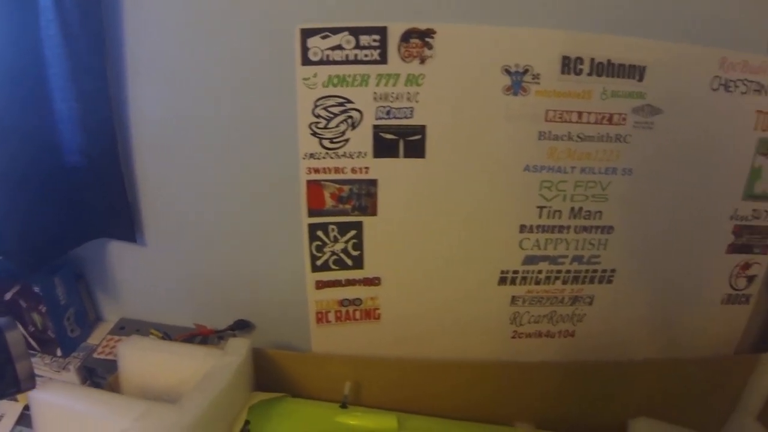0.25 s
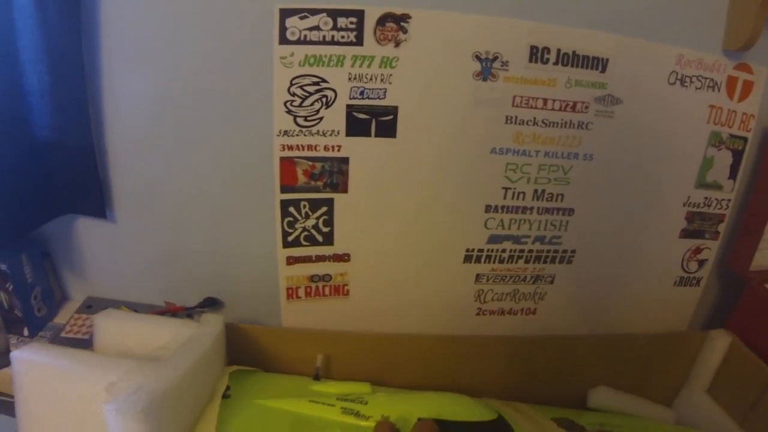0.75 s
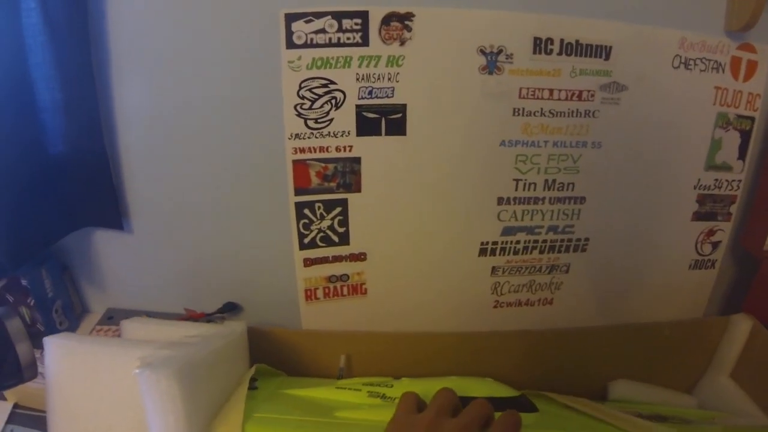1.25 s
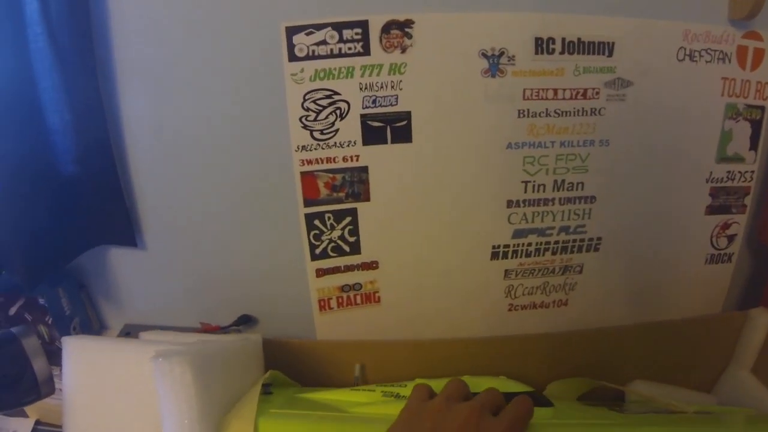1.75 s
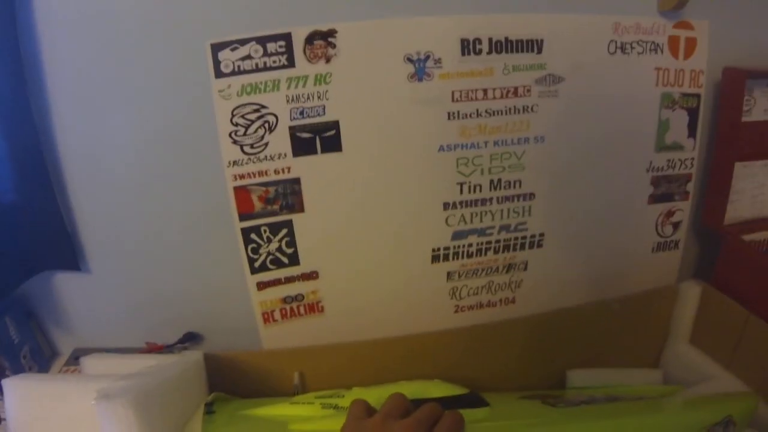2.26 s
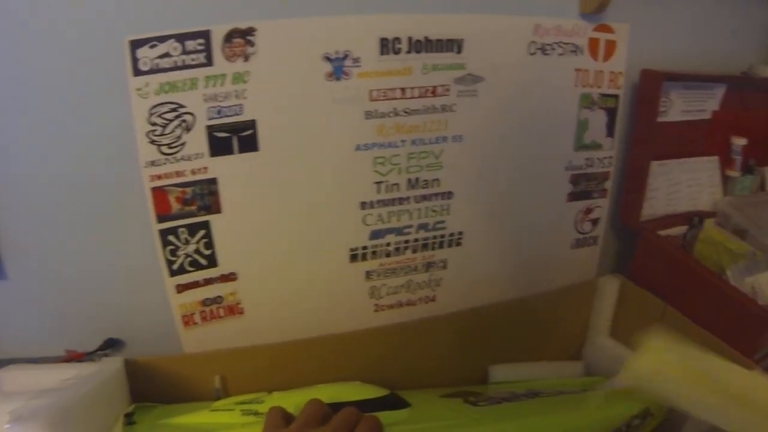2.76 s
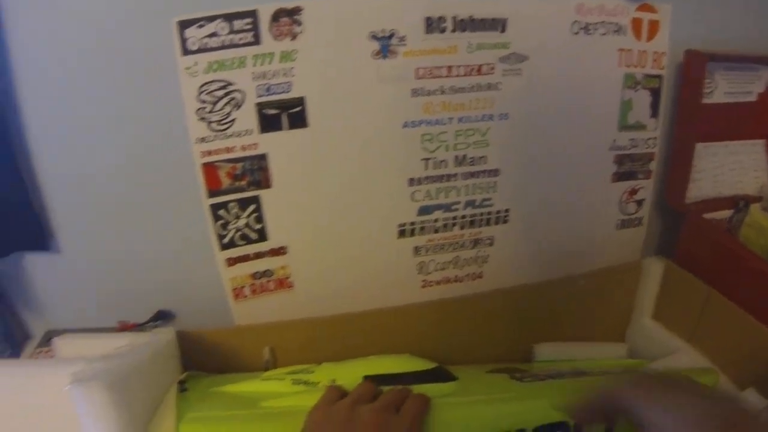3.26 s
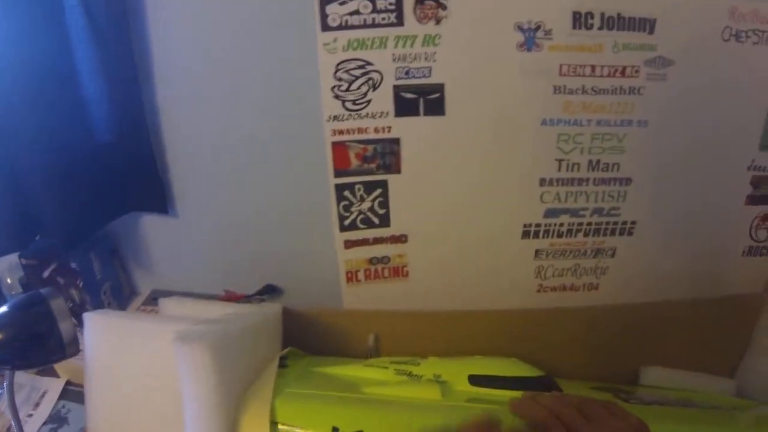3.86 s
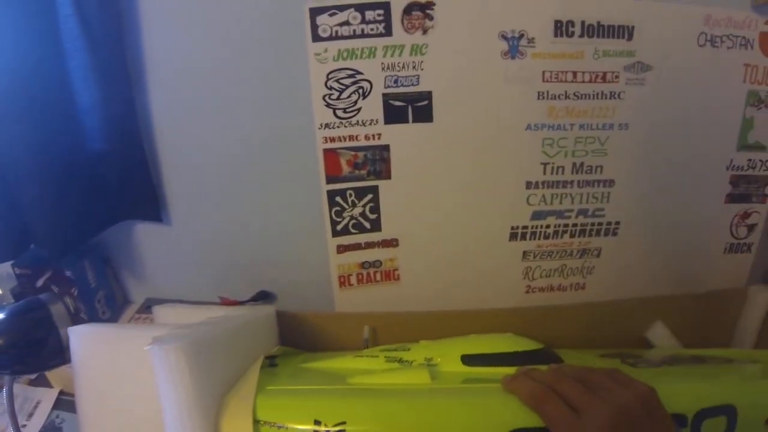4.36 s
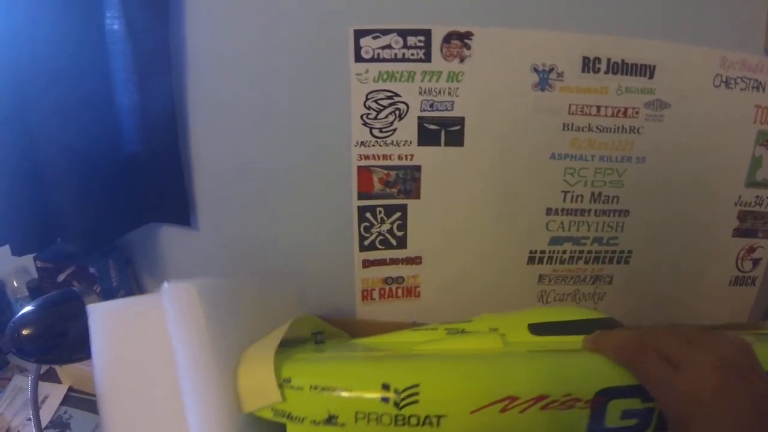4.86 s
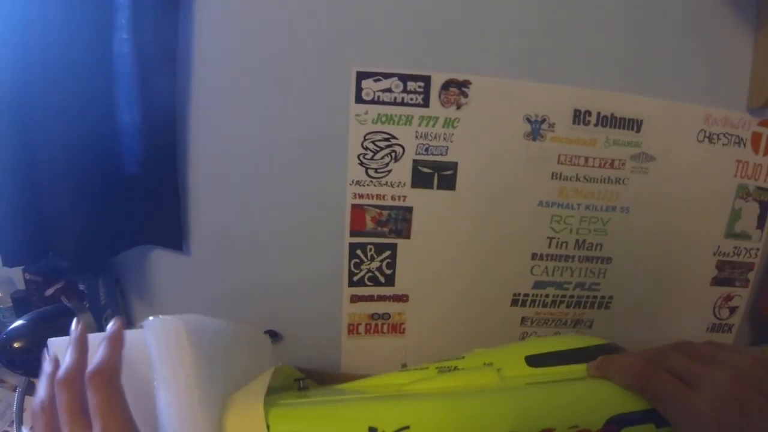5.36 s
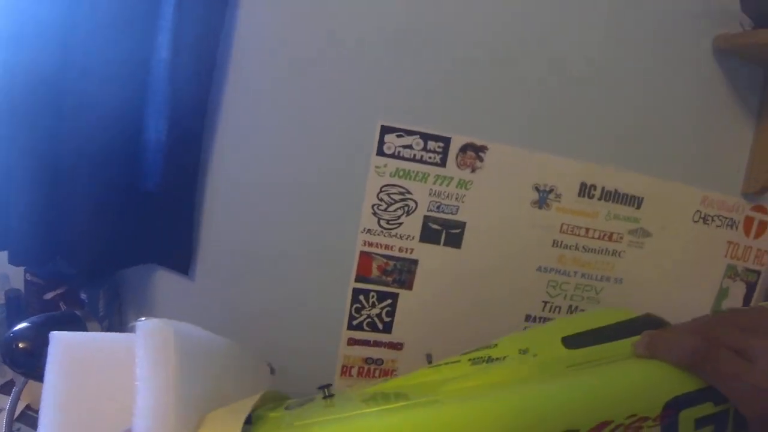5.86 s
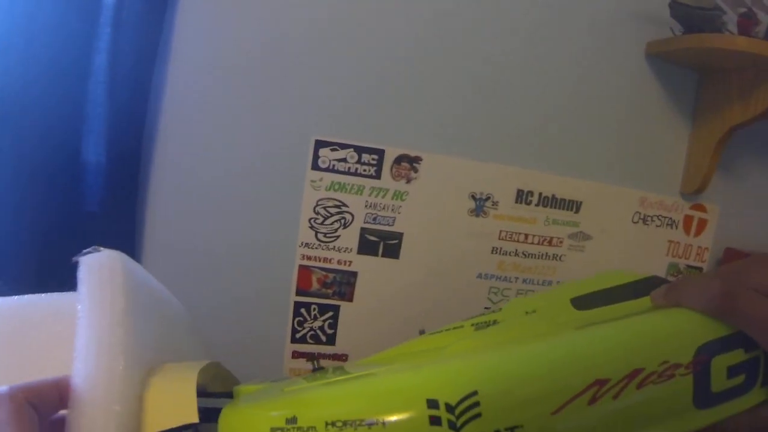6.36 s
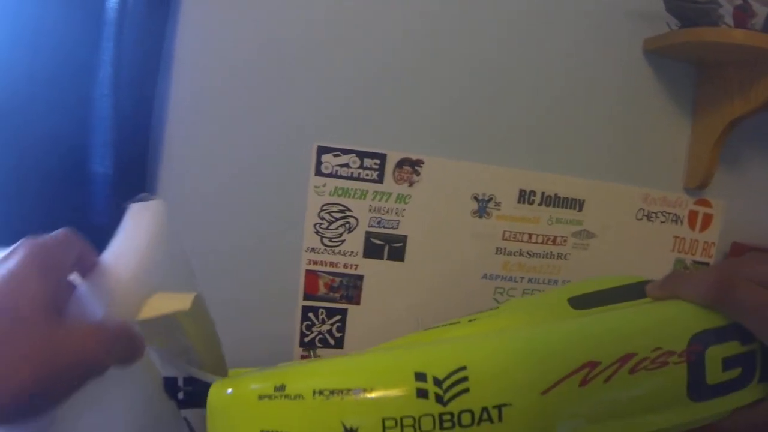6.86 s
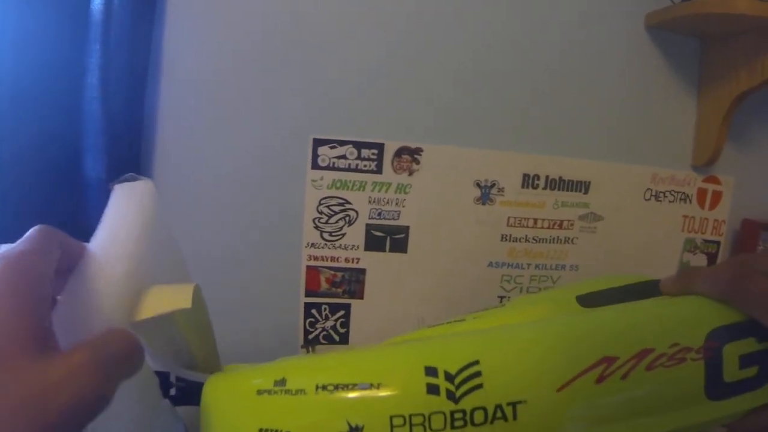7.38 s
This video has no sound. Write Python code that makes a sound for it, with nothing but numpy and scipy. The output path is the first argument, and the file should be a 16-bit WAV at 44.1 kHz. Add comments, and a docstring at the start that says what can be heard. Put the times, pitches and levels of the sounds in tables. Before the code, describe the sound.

A hollow model boat hull is worked out of foam packing and a cardboard box, close to the microphone in a small room with a faint steady hush. For the first second, foam rubs and crackles with dry snaps and light bumps, then eases off. From 2 to 2.6 seconds comes a loud cluster of hollow knocks, low thumps, snaps and rasping foam. After a lull, the hull creaks briefly against the foam and bumps at about 3.5 seconds, followed by soft scrapes. A second group of hollow knocks with rubbing falls between 4.7 and 5.3 seconds. Small snaps and light scrapes continue, fading until about 6.9 seconds, when a short creak, a low thud from the flexing box and more rubbing break in. A sharp knock with a low thump lands at about 7.5 seconds.

```python
"""Foam rubs and rasps among hollow knocks and dry snaps: a hollow model boat hull is worked out of
its foam packing and cardboard box in a small room, close to a camera. Friction is modelled as stick-slip grains,
bead rings and noise; blows as a contact and chatter exciting damped modes and panels; snaps as decaying bursts.
Short tones arise where slips lock to a panel's pitch. Air pushed by the walls, echo and a hush surround them."""
import sys
import numpy as np
from scipy import signal
from scipy.fft import rfft, irfft, next_fast_len
from scipy.io import wavfile
from scipy.ndimage import uniform_filter1d, map_coordinates

SR = 44100
rng = np.random.default_rng(int(sys.argv[2]) if len(sys.argv) > 2 else 0)


def digitize_waveform(pressure):
    """Quantize a signal to 16-bit integers and store it at the path in sys.argv[1].

    Rows of a 2-D input are taken as channels; values are limited to [-1, 1].
    """
    field = np.atleast_2d(pressure).T
    bounded = np.clip(field, -1, 1)
    quanta = np.round(bounded * 32767).astype(np.int16)
    wavfile.write(sys.argv[1], SR, quanta)


N = 336042

# Steady hush of the room: (frequency [Hz], spectral density [dB per Hz])
QUIET_SPECTRUM = [(20, -5), (44, -7.5), (60, 6), (85, -23.5), (200, -22.5), (450, -19), (800, -13.5),
                  (1300, -23), (2000, -24), (4000, -26.5), (6500, -44), (10000, -40), (15000, -48)]
# Reverberation of the room: (frequency [Hz], decay time t60 [s])
ROOM_DECAY = [(100, 0.42), (300, 0.28), (800, 0.26), (2000, 0.19), (5000, 0.26), (14000, 0.25)]
# Air moved by the box walls, before trim and surge: (time [s], level [dB])
SWAY_LEVELS = [(0.0, -38), (0.27, -35), (0.45, -38), (1.89, -48), (2.12, -20.5), (2.33, -42), (2.46, -27.5),
               (2.8, -44.5), (3.4, -43.5), (3.5, -30.5), (4.75, -44.5), (4.86, -31), (4.99, -33.5),
               (5.47, -43.5), (6.81, -45.5), (6.92, -21.5), (7.15, -45), (7.47, -49), (7.53, -18),
               (7.62, -33)]
# Spectrum of that air: (frequency [Hz], spectral density [dB per Hz])
AIR_SPECTRUM = [(12, -5), (22, -4.5), (34, 1.5), (48, -13), (62, -1), (90, -24.5), (160, -40), (400, -84)]
# Modes of the hull in its box, before scatter: (frequency [Hz], relative level [dB], decay time t60 [s])
HULL_MODES = [(129.2, -10, 0.41), (186, -32, 0.21), (216, -22, 0.2), (328.1, -2.5, 0.21), (400, 3, 0.041),
              (475.3, 3.5, 0.093), (592, -10, 0.41), (716, -8.5, 0.053), (835, -14, 0.51), (979, 3, 0.044),
              (1450, -24.5, 0.35), (1650, -12, 0.06), (1774, -2, 0.05), (1913, 5, 0.021), (2150, 9, 0.022),
              (2200, -4, 0.067), (3050, 9, 0.049), (3290, -13, 0.12)]
# Hull juddering over foam: (time [s], length [s], mean slip rate [1/s], level [dB], rasp against tone [dB])
GROANS = [(3.488, 0.024, 480, -27.5, -10), (3.527, 0.03, 452, -20, -4.5), (3.586, 0.04, 450, -32.5, -6),
          (6.886, 0.045, 332, -21.5, -23)]
# Response of the rubbed shell: (frequency [Hz], gain [dB])
RASP_RESPONSE = [(700, -22), (860, 8), (1030, 7), (1150, -12), (1450, -19), (1600, -2), (1740, -4),
                 (1900, -20), (2200, -20), (2400, -4), (2700, -25), (3100, -12), (3300, -6), (3700, -29),
                 (9000, -42)]
# Snaps of foam and card, before trim: (time [s], peak level [dB], centre frequency [Hz])
SNAPS = [(0.136, -27.5, 2980), (0.166, -20.5, 2060), (0.46, -19, 2600), (0.482, -27, 1960),
         (0.491, -18.5, 2120), (0.553, -22.5, 1650), (0.611, -19, 1580), (0.641, -23, 1920),
         (1.203, -38, 1470), (1.351, -27.5, 3060), (1.423, -33.5, 1500), (1.807, -27.5, 1620),
         (1.932, -19.5, 1960), (2.378, -16.5, 2200), (2.496, -17, 1774), (2.614, -23.5, 2420),
         (2.788, -33.5, 2370), (2.851, -28, 1440), (2.92, -30.5, 2000), (3.953, -29.5, 1840),
         (5.523, -28.5, 1600), (5.581, -22.5, 1620), (6.185, -31, 3100), (6.617, -38, 1860),
         (7.014, -20.5, 1840), (7.064, -27.5, 2140)]
# Short strokes of foam over card, before trim: (time [s], length [s], level [dB], centre frequency [Hz])
SCRAPES = [(0.182, 0.084, -36.5, 1930), (0.391, 0.064, -35, 890), (0.746, 0.078, -37.5, 1770),
           (1.07, 0.11, -45, 1020), (1.692, 0.25, -40, 1080), (2.002, 0.062, -26, 2230),
           (2.212, 0.12, -36.5, 1790), (2.97, 0.075, -46.5, 1930), (3.343, 0.14, -44.5, 2310),
           (4.018, 0.14, -40, 1860), (4.356, 0.076, -48.5, 3000), (4.672, 0.19, -37.5, 820),
           (5.183, 0.12, -38.5, 1260), (5.537, 0.046, -37, 1650), (5.761, 0.063, -38, 1750),
           (5.907, 0.033, -48, 1170), (6.172, 0.045, -38, 1560), (6.72, 0.29, -46, 1810),
           (6.888, 0.073, -40, 6000), (6.999, 0.069, -46, 2260), (7.062, 0.011, -32.5, 1160),
           (7.21, 0.061, -38, 1170), (7.41, 0.079, -45, 3100)]
# Sliding contact, before trims: (time [s], heavy drag level [dB], rub level [dB], surface grit level [dB])
SLIDE_LEVELS = [(0.0, -42, -40, -53), (0.34, -40.5, -37.5, -51), (0.78, -38.5, -41.5, -49.5),
                (0.98, -45.5, -41, -59), (1.51, -52.5, -52.5, -54), (1.78, -48, -47, -61),
                (2.08, -54, -36, -37), (2.19, -42, -30, -46), (2.33, -41.5, -39.5, -42.5),
                (2.46, -29, -28.5, -32.5), (2.61, -62, -55.5, -50), (2.97, -52, -51.5, -86),
                (3.33, -52, -51, -64), (3.54, -42, -46.5, -61.5), (4.35, -46.5, -50, -60),
                (4.61, -45, -43, -52.5), (4.86, -49, -32.5, -41.5), (5.01, -46.5, -56, -66),
                (5.32, -51.5, -51, -66), (5.71, -42.5, -43.5, -57), (5.86, -51, -51, -60),
                (6.73, -53, -57.5, -62.5), (6.94, -36.5, -35, -44), (7.19, -53.5, -61, -60),
                (7.45, -49, -48.5, -60), (7.62, -40, -45.5, -47)]
# Colour of the heavy drag: (frequency [Hz], spectral density [dB per Hz])
DRAG_SPECTRUM = [(60, -11), (100, -0.5), (130, -0.5), (160, 1.5), (200, -4), (260, -4.5), (335, -2.5),
                 (470, -5), (590, -3.5), (720, -5), (950, -8), (1800, -48.5)]
# Colour of the rub: (frequency [Hz], spectral density [dB per Hz])
RUB_SPECTRUM = [(350, -28), (650, 3.5), (950, 3.5), (1300, -3.5), (1900, 1.5), (2600, -10), (3200, -2),
                (4200, -14), (5500, -23), (9000, -43)]
# Colour of the surface grit: (frequency [Hz], spectral density [dB per Hz])
GRIT_SPECTRUM = [(1800, -25), (3000, 3), (4300, 11), (5300, 13.5), (6500, 3), (8500, 13), (10500, 1),
                 (12500, -4), (15500, -18)]
# Blows on hull and box: (time [s], strength [dB], contact rise [s], chatter decay time t60 [s],
# pitch of the struck panel [Hz], hardness [dB], weight [dB])
KNOCKS = [(0.103, -30.5, 0.0012, 0.029, 615, 3, 8.5), (0.16, -41.5, 0.0087, .16, 193, 1, 9),
          (0.275, -40.5, 0.0038, 0.1, 187, -6, 11.5), (0.345, -32, 0.0083, .14, 312, -19, -5),
          (0.8716, -36, 0.0003, 0.037, 590, 13, 5.5), (1.5117, -42.5, 0.00035, 0.029, 454, 7.5, -8),
          (2.02, -23.5, 0.0012, 0.049, 640, 6, 7), (2.038, -20.5, 0.00043, 0.033, 837, 3, 4.5),
          (2.059, -27.5, 0.0054, 0.3, 460, 5, 7.5), (2.101, -17, 0.00031, 0.12, 447, 2.5, -1),
          (2.416, -24.5, 0.00042, 0.067, 556, 2.5, 0.5), (2.456, -36, 0.0054, 0.21, 484, 5, 12.5),
          (2.5175, -21.5, 0.0014, 0.14, 505, -0.5, -14), (3.347, -43.5, 0.0025, .094, 202, 2, 11.5),
          (3.4896, -34.5, 0.0013, .08, 476, -6, 8), (3.535, -24, 0.0049, 0.048, 486, -8.5, 2),
          (3.8293, -41, 0.0025, .045, 201, -5.5, -8), (4.073, -33, 0.0068, 0.11, 470, -5.5, 5.5),
          (4.458, -34, 0.0051, 0.051, 2320, 10.5, 2.5), (4.785, -23, 0.00073, 0.13, 457, -2, -8),
          (4.815, -22.5, .006, 0.078, 354, 0, 8.5), (4.843, -12, 0.0056, 0.021, 477, -13.5, -6),
          (4.877, -30.5, 0.0038, 0.13, 479, -1, 8.5), (5.0411, -23, 0.0015, 0.22, 483, -3, -3.5),
          (5.2194, -24.5, 0.00153, 0.039, 326, -14, -2.5), (5.4105, -40.5, 0.00039, 0.069, 760, 1.5, -1),
          (6.1011, -39, 0.00024, 0.032, 325, 9, -15), (6.892, -24, .012, 0.045, 476, 1.5, 2.5),
          (6.985, -46.5, 0.004, .08, 335, -21, 15.5), (7.5113, -16, 0.00019, 0.05, 1300, -4.5, -2.5),
          (7.585, -44, 0.0059, 0.12, 189, 2, 8)]
# Response of the struck contact: (frequency [Hz], gain [dB])
CONTACT_RESPONSE = [(150, 17.5), (260, -6.5), (335, 0), (470, -3), (590, -3.5), (960, 3), (1200, -1.5),
                    (1900, -1.5), (2650, -10), (3250, -4), (4300, -14.5), (6500, -25), (8500, -21),
                    (15000, -39)]
# Response of the air space in the box: (frequency [Hz], gain [dB])
BOX_RESPONSE = [(60, -11), (95, -9.5), (130, -1), (155, -8.5), (195, -8), (260, -13.5), (400, -23.5)]
# Registers of a blow, in order push, boom, body, clack, crack, fizz: (low edge [Hz], high edge [Hz])
REGISTERS = [(20, 90), (100, 250), (290, 680), (720, 2300), (2500, 5500), (6200, 15000)]
# Share of a blow in each register: (level [dB], gain per hardness [dB/dB], gain per weight [dB/dB])
REGISTER_SHARES = [(-9.5, 0, 1.36), (-6, 0, 1.22), (1.5, 0, 0), (-1, 0.94, 0), (-11, 1.41, 0),
                   (-29.5, 1.39, 0.5)]

TOP_HZ = 15600  # upper band limit
DRAG_DB, RUB_DB, GRIT_DB = 0.65, -2.84, -12  # trims on the sliding levels
SWAY_DB, SWAY_SURGE_DB = -2.5, 1.5  # trim on the sway levels, and depth of its uneven surges
# stray ticks: mean rate, level against the rub column, centre frequency
CRACKLES_PER_S, CRACKLE_DB, CRACKLE_HZ = 110, -9, 1850


def amp(db):
    """Level law: decibels to amplitude gain."""
    return 10 ** (np.asarray(db) / 20)


def unit(x):
    """Normalisation: scale to rms 1."""
    return x / np.sqrt(np.mean(x ** 2) + 1e-20)


def along(points, hz):
    """Logarithmic frequency scale: read (Hz, value) points by interpolation."""
    f, v = np.transpose(points)
    return np.interp(np.log(hz + 1), np.log(f + 1), v)


def curves(rows):
    """Linear interpolation: one value per sample for each column after the time."""
    s, *cols = np.transpose(rows)
    return [np.interp(np.arange(N) / SR, s, c) for c in cols]


def wobble(rate):
    """Slow random process: a smooth curve through random knots, rate of them a second."""
    knots = rng.standard_normal(int(N * rate / SR) + 4)
    return map_coordinates(knots, [np.arange(N) * rate / SR])


def colour(x, points):
    """Minimum-phase filtering: a folded cepstrum makes the gain of the (Hz, dB) points causal."""
    m = 2 * next_fast_len(len(x) // 2 + 4096)
    gain = amp(along(points, np.fft.rfftfreq(m, 1 / SR)))
    cepstrum = irfft(np.log(gain), m)
    cepstrum[1:m // 2] *= 2
    cepstrum[m // 2 + 1:] = 0
    return irfft(rfft(x, m) * np.exp(rfft(cepstrum)), m)[:len(x)]


def band(x, lo_hz, hi_hz, order=2):
    """Band limitation: causal Butterworth band-pass."""
    edges = [lo_hz, min(hi_hz, SR / 2 - 100)]
    return signal.sosfilt(signal.butter(order, edges, "band", fs=SR, output="sos"), x)


def fade(t, t60):
    """Linear damping: exponential decay, 60 dB down after t60."""
    return np.exp(-np.log(1000) * t / t60)


def add(track, s, sound):
    """Superposition: mix a sound into the track at time s."""
    part = track[max(round(s * SR), 0):][:len(sound)]
    part += sound[:len(part)]


def hush():
    """Stationary noise: the steady quiet of the room."""
    return amp(-53.5) * unit(colour(rng.standard_normal(N), QUIET_SPECTRUM))


def room(x, delay=.006, count=20):
    """Reverberation: decaying noise tails answer the sound, drawn afresh along the way and cross-faded."""
    out, edges = np.zeros(N), np.linspace(0, N, count + 1).astype(int)
    for start, end in zip(edges, edges[1:]):
        # each frequency of the tail decays at its own rate
        hz, t, z = signal.stft(rng.standard_normal(SR // 2), SR, nperseg=256)
        decay = fade(t, along(ROOM_DECAY, hz)[:, None])
        tail = signal.istft(z * decay, SR, nperseg=256)[1]
        # neighbouring stretches cross-fade into each other
        width = end - start
        first, last = max(start - width // 2, 0), min(end + width // 2, N)
        offset = np.arange(first, last) - (start + end) / 2
        share = np.cos(np.pi / 2 * offset / width)
        echo = signal.fftconvolve(x[first:last] * share, tail / np.linalg.norm(tail))
        add(out, first / SR + delay, echo)
    return out


def sway():
    """Volume displacement: the flexing box pushes slow, uneven waves of air at the microphone."""
    level_db, = curves(SWAY_LEVELS)
    gain = amp(level_db + SWAY_DB + SWAY_SURGE_DB * wobble(7.8))
    return gain * unit(colour(rng.standard_normal(N), AIR_SPECTRUM))


def hull_ring(x, ring_db, scatter_db):
    """Modal resonance: the contact plus hull modes that vary with where it is touched and held."""
    modes = np.zeros(len(x))
    scatter = rng.standard_normal((len(HULL_MODES), 2))
    for (hz, db, t60), (louder, sharper) in zip(HULL_MODES, scatter):
        radius = fade(1 / SR, t60)
        turn = np.cos(2 * np.pi * hz * (1 + 0.0051 * sharper) / SR)
        ring = signal.lfilter([1, -radius * turn], [1, -2 * radius * turn, radius ** 2], x)
        modes += amp(db + scatter_db * louder) * ring
    return x + amp(ring_db) * modes


def foam_colour(x, hz):
    """Broad resonance: a hump whose centre depends on the size of the contact."""
    hump = [(hz / 8, -16), (hz / 2, -4), (hz, 0), (hz * 1.43, -5), (hz * 2.87, -19), (hz * 7, -34)]
    return colour(x, hump)


def slips(rate, size_db, clump_db, smooth):
    """Stick-slip: irregular tiny releases of uneven size, in clumps, over a smooth share of friction."""
    happens = rng.random(N) < rate / SR
    sizes = amp(size_db * np.minimum(rng.exponential(size=N), 4)) * rng.choice([-1, 1], N)
    friction = unit(happens * sizes) + smooth * rng.standard_normal(N)
    return friction * amp(clump_db * wobble(55))


def groans(jitter=0.071, octave_db=-15, uneven_db=-2.5):
    """Locked stick-slip: slips briefly follow a panel's pitch, and each one also rasps the shell."""
    out = np.zeros(N)
    waver, pressure = wobble(250), amp(uneven_db * wobble(210))
    for s, length, hz, db, rasp_db in GROANS:
        start, n = int(s * SR), int(length * SR)
        phase = 2 * np.pi * np.cumsum(hz * (1 + jitter * waver[start:start + n])) / SR
        tone = unit(np.sin(phase) + amp(octave_db) * np.sin(2 * phase))
        pulsed = rng.standard_normal(n) * (1 + np.cos(phase)) ** 2
        rasp = unit(colour(pulsed, RASP_RESPONSE))
        groan = (tone + amp(rasp_db) * rasp) * pressure[start:start + n] * np.hanning(n)
        add(out, s, amp(db) * unit(groan))
    return out


def crackle(size_db=2.0, t60=0.023):
    """Random releases: sliding edges catch and let go in stray ticks, louder the harder the foam rubs."""
    rub_db = curves(SLIDE_LEVELS)[1]
    happens = rng.random(N) < CRACKLES_PER_S / SR
    catches = happens * amp(size_db * np.minimum(rng.exponential(size=N), 3))
    envelope = signal.lfilter([1], [1, -fade(1 / SR, t60)], catches)
    ticks = envelope * rng.standard_normal(N)
    return amp(rub_db + CRACKLE_DB) * unit(foam_colour(ticks, CRACKLE_HZ))


def snaps(t60=0.045, level_db=-1.5, impact=4.3):
    """Sudden release: foam beads and card edges let go with a short dry crack."""
    out, t = np.zeros(N), np.arange(SR // 8) / SR
    for s, db, hz in SNAPS:
        burst = rng.standard_normal(len(t)) * fade(t, t60)
        burst[0] += impact
        crack = foam_colour(hull_ring(burst, ring_db=-44, scatter_db=-5), hz)
        add(out, s, amp(db + level_db) * crack / np.abs(crack).max())
    return out


def scrapes(level_db=-4.5):
    """Enveloped stick-slip: a short stroke is a run of slips that swells quickly and thins out."""
    out = np.zeros(N)
    friction = slips(rate=700, size_db=1.0, clump_db=1.0, smooth=0.8)
    for s, length, db, hz in SCRAPES:
        run = friction[int(s * SR):][:int(length * SR)]
        u = np.linspace(0, 1, len(run))
        stroke = run * np.sin(np.pi * u ** 0.53)
        add(out, s, amp(db + level_db) * unit(foam_colour(stroke, hz)))
    return out


def beads(rate=1900, cycles=4.3, size_db=2.5, patchy_db=1.5):
    """Damped oscillation: foam beads flick free, each ringing a few cycles at its own pitch."""
    when, pitch, size = rng.random((int(rate * N / SR), 3)).T
    hz = 500 * 11 ** pitch[:, None]
    k = np.arange(200)  # samples in each grain
    # the patch of foam that grips keeps changing, and favours other pitches as it does
    grip = map_coordinates(rng.standard_normal((200, 7)), [when * 199, pitch * 6])
    size_curve_db = size_db * np.minimum(-np.log(1 - size), 4)
    strength = amp(size_curve_db + patchy_db * grip)[:, None]
    # short, high grains are stronger, which keeps the spectrum level
    ring = np.sin(2 * np.pi * hz * k / SR) * np.exp(-hz * k / SR / cycles)
    waves = strength * hz * ring
    places = (when * N).astype(int)[:, None] + k
    return unit(np.bincount(places.ravel(), waves.ravel(), N)[:N])


def sliding():
    """Dry friction: heavy slips shake the box, beads rasp and the surface hisses under dragged foam."""
    drag_db, rub_db, grit_db = curves(SLIDE_LEVELS)
    coarse = slips(rate=350, size_db=1.5, clump_db=3.0, smooth=0.78)
    grip_db = 2 * wobble(45)
    drag = unit(colour(hull_ring(coarse, ring_db=-56.5, scatter_db=2.5), DRAG_SPECTRUM))
    # even friction lies under the separate beads
    rubbing = (beads() + rng.standard_normal(N)) * amp(grip_db)
    rub = unit(colour(rubbing, RUB_SPECTRUM))
    hiss = rng.standard_normal(N) * amp(.5 * grip_db + 2.8 * wobble(400))
    grit = unit(colour(hiss, GRIT_SPECTRUM))
    return amp(drag_db + DRAG_DB) * drag + amp(rub_db + RUB_DB) * rub + amp(grit_db + GRIT_DB) * grit


def knocks(impact=12.0, push_hz=39.3, push_t60=0.18, boom_hold=1.63, panel_db=4.5, panel_width=0.034):
    """Impact excitation: a contact and dying chatter; hard blows are brighter, heavy ones boom and push air."""
    out, t = np.zeros(N), np.arange(SR // 2) / SR
    head = int(.03 * SR)  # averaging span for the loudest moment
    for s, db, rise, t60, panel_hz, hardness_db, weight_db in KNOCKS:
        grain = rng.standard_normal((2, len(t)))
        swell = np.minimum(t / rise, 1) ** 2
        force = grain[0] * swell * fade(np.maximum(t - rise, 0), t60)
        # a slow, cushioned contact has less of a sharp edge
        force[int(rise * SR)] += impact / (1 + rise / 0.0011)

        def panel(x):
            """Local resonance: the panel under the blow gives the knock its hollow pitch."""
            low, high = panel_hz * (1 - panel_width), panel_hz * (1 + panel_width)
            return amp(panel_db) * band(x, low, high, order=1)

        struck = colour(hull_ring(force, ring_db=-54, scatter_db=0.5) + panel(force), CONTACT_RESPONSE)
        # the big soft walls of the box swing at a pitch scattered around push_hz
        swing_hz = push_hz * np.exp(0.2 * rng.standard_normal())
        push = np.sin(2 * np.pi * swing_hz * t) * fade(t, push_t60)
        # they also shudder longer than the chatter lasts
        shudder = grain[1] * swell * fade(t, boom_hold * t60)
        boom = colour(hull_ring(shudder, ring_db=-56.0, scatter_db=4.5) + panel(shudder), BOX_RESPONSE)
        sources = [push, boom] + [struck] * 4
        for source, edges, shares in zip(sources, REGISTERS, REGISTER_SHARES):
            share_db, by_hardness, by_weight = shares
            part = band(source, *edges, order=3)
            loudest = uniform_filter1d(part ** 2, head).max()
            gain = amp(db + share_db + by_hardness * hardness_db + by_weight * weight_db)
            add(out, s - rise / 2, gain * part / np.sqrt(loudest))
    return out


def scene():
    """Superposition: handling sounds, their echo, the moved air and the hush of the room."""
    handling = groans() + crackle() + snaps() + scrapes() + sliding() + knocks()
    return (hush() + amp(-6.5) * room(handling) + sway() + handling)[None]


def record(dry):
    """Soft saturation and band limitation: the camera rounds the highest peaks and keeps nothing above TOP_HZ."""
    held = dry / (1 + np.abs(dry) ** 6) ** (1 / 6)
    m = next_fast_len(N + SR // 2)
    kept = np.fft.rfftfreq(m, 1 / SR) < TOP_HZ
    return irfft(rfft(held, m) * kept, m)[..., :N]


dry = scene()
out = record(dry)
digitize_waveform(out)
```